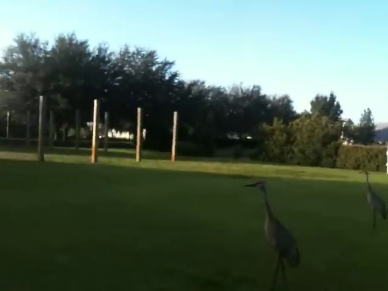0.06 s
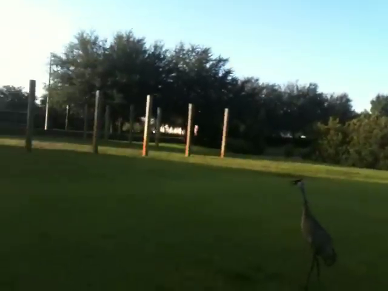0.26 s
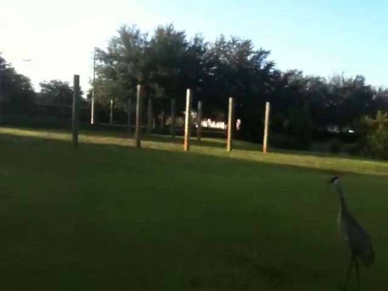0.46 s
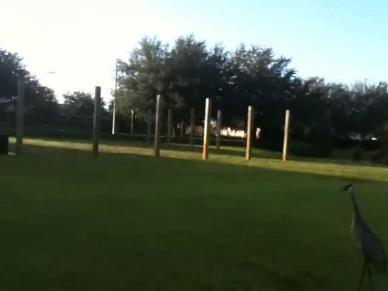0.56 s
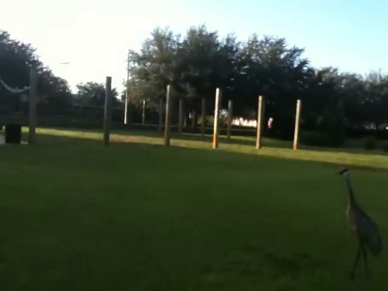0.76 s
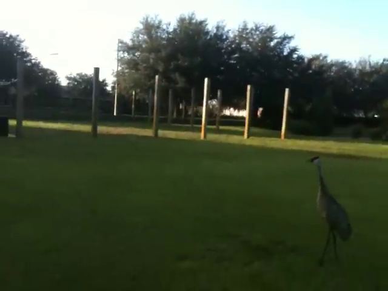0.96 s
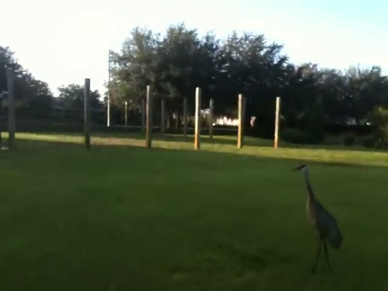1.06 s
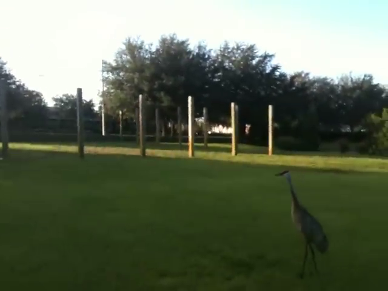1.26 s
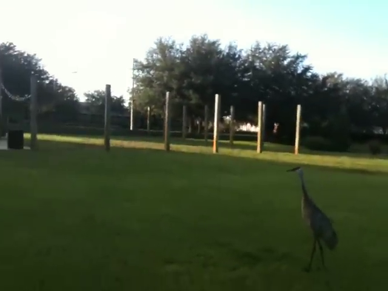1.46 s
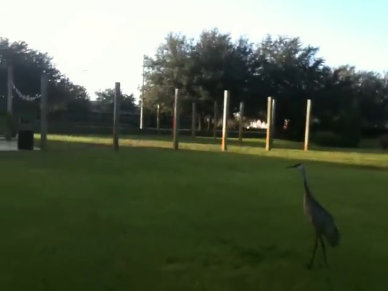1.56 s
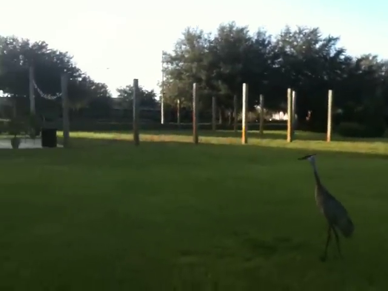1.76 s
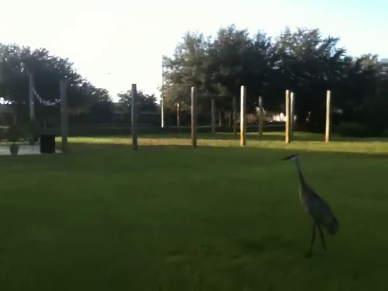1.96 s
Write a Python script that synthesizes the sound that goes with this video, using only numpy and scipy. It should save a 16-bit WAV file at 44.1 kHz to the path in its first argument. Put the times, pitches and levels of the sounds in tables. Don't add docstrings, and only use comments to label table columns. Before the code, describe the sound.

Two cranes call once in duet on an open lawn: the near bird gives a soft rising note then a loud rapid rattle, the farther one overlaps higher and quieter, with slight house echo and low hum, small camera microphone.

```python
import sys
import numpy as np
from scipy import signal
from scipy.fft import rfft, irfft, next_fast_len
from scipy.io import wavfile
from scipy.ndimage import uniform_filter1d

SR = 44100
rng = np.random.default_rng(int(sys.argv[2]) if len(sys.argv) > 2 else 0)


def to_wav(sig):
    pcm = np.clip(np.atleast_2d(sig), -1, 1) * 32767
    pcm = np.round(pcm).astype(np.int16)
    wavfile.write(sys.argv[1], SR, pcm.T)


def amplitude_ratio(level_db):
    exponent = np.asarray(level_db, float) / 20
    return 10 ** exponent


N = 90405
T = np.arange(N) / SR
M = next_fast_len(N + SR)
F = np.maximum(np.arange(M // 2 + 1) * SR / M, 1e-3)

# (first pulse [s], pulse rate [Hz], level [dB], ring pitch [Hz], ring level [dB])
NEAR_BURSTS = [
    (.3199, 947, -8, 844, -3),
    (.3885, 948, -7.5, 848, -3),
    (.4512, 937, -8, 847, -5),
    (.5088, 900, -7.5, 848, -8),
    (.5670, 890, -7.5, 826, -8),
    (.6222, 867.5, -8.5, 794, -7.5),
    (.6765, 828, -12, 788, -4.5),
    (.7335, 585, -29.5, 507, 4),
]
FAR_BURSTS = [
    (.5267, 992, -17.5, 892, 2.5),
    (.6008, 1088, -14.5, 900, -2.5),
    (.6672, 1093, -15, 900, -4),
    (.7273, 1091, -16.5, 939, -5),
    (.7855, 1092, -17, 961, -4.5),
    (.8441, 1046, -17, 897, -1),
    (.8980, 1041, -17.5, 885, -1.5),
    (.9513, 987, -16.5, 878, -2.5),
    (1.0045, 950, -19.5, 824, -2),
    (1.0578, 663, -27, 600, -12),
]
# (centre [Hz], width [Hz], level [dB])
NEAR_PIPE_MODES = [(790, 170, 1), (600, 230, -8), (1370, 220, -12), (2090, 200, -5), (3390, 930, -5.5),
                   (4860, 4500, -8.5), (9100, 14000, -48)]
FAR_PIPE_MODES = [(900, 120, 8.5), (680, 68, -19), (1170, 122, 1.5), (1345, 250, -2), (2050, 500, -2),
                  (2890, 430, -0.5), (4530, 1600, 0), (9100, 5000, -27)]
# (frequency [Hz], level [dB])
PULSE_SPECTRUM = [(500, -3), (900, 3.2), (1800, -13), (3000, -17.5), (5000, -15.5), (8000, -23),
                  (12000, -40.5), (16000, -55.5)]
# (delay [s], pitch [Hz], length [s], level [dB], overtone [dB], knock [Hz], knock [dB])
THROAT_CLOSING = (.0125, 600, .017, -17, -7, 800, -15)
# (time [s], pitch [Hz], level [dB])
NEAR_NOTE = [(.188, 440, -48), (.194, 470, -33), (.202, 510, -28), (.216, 551, -26.5), (.23, 572, -24),
             (.242, 572, -24), (.247, 545, -32), (.255, 520, -50)]
FAR_NOTE = [(.41, 590, -50), (.423, 610, -38), (.435, 630, -36), (.447, 640, -35.5), (.458, 630, -39),
            (.47, 620, -56)]
# (order [-], level [dB])
NOTE_HARMONICS = [(1, 0), (2, -11), (3, -8), (4, -7), (5, -13), (6, -13), (7, -19), (8, -19), (9, -16),
                  (10, -19), (11, -22), (12, -24), (13, -25), (14, -26), (15, -31), (16, -37), (17, -31),
                  (18, -35)]
# (time [s], pitch [Hz], length [s], level [dB])
THROAT_CATCHES = [
    (.190, 900, .012, -38),
    (.238, 1040, .007, -33),
    (.242, 850, .012, -31),
    (.241, 1330, .012, -38),
    (.311, 900, .008, -31),
]
# (delay [s], level [dB])
WALL_SLAPS = [(.024, -30), (.033, -27), (.043, -24), (.052, -27), (.062, -28)]
# (centre [Hz], width [Hz], level [dB])
TAIL_LIFT = (1143, 240, 5.9)
# (frequency [Hz], density [dB/Hz])
HUM_SPECTRUM = [(30, -34), (100, -15), (165, -2.5), (255, -3.5), (320, -16), (1000, -15), (3500, -31),
                (16000, -50)]
# (time [s], level [dB])
TRAFFIC_SWELL = [(0, 0.3), (.3, 0), (1.4, -0.5), (1.9, -0.9), (2.05, 2)]

NEAR_STROKE = dict(pulses_s=.0062, ring_end_s=.0108, ring_fade_db_s=300, ring_tilt_db_oct=-11,
                   air_db=-10, air_fade_s=.011, swell_s=.0036)
FAR_STROKE = dict(pulses_s=.0055, ring_end_s=.02, ring_fade_db_s=650, ring_tilt_db_oct=-12,
                  air_db=-7, air_fade_s=.009, swell_s=.0026)
LEAD_S, RISE_S, STOP_S = .0004, .0016, .0014
SKEW_RAD, JITTER = .3, .015
STROKE_N = int(.05 * SR)
STROKE_T = np.arange(STROKE_N) / SR - LEAD_S
STROKE_ON = np.maximum(STROKE_T, 0)


def crane(bursts, note, modes, stroke, edge_db, closing=None):
    tone, puff = rattle(bursts, stroke, edge_db, closing)
    pipe = sum(amplitude_ratio(db) * mode(hz, width_hz) ** 2 * np.sqrt(SR / 4 / width_hz) for hz, width_hz, db in modes)
    return opening(note) + tone + shape(puff, pipe)


def rattle(bursts, stroke, edge_db, closing):
    tone, puff = np.zeros(N), np.zeros(N)
    loudest_db = max(row[2] for row in bursts)
    age = STROKE_ON / stroke["air_fade_s"]
    for start_s, rate_hz, db, ring_hz, ring_db in bursts:
        air, wobble, shake = rng.standard_normal((3, STROKE_N))
        wobble, shake = (uniform_filter1d(w, size=50) * np.sqrt(50) for w in (wobble, shake))
        effort_db = db - loudest_db
        dull_db = .49 * effort_db
        wave, phase = pulses(rate_hz, stroke, edge_db, dull_db, air, wobble, shake)
        wave += throat_ring(ring_hz, ring_db, stroke, phase, wobble, shake)
        if closing:
            wave += throat_closing(closing, wobble, shake)
        here = slice(int((start_s - LEAD_S) * SR), int((start_s - LEAD_S) * SR) + STROKE_N)
        tone[here] += amplitude_ratio(db) * wave
        air_db = db + stroke["air_db"] + 2 * dull_db + 2.86 * shake
        puff[here] += amplitude_ratio(air_db) * air * age * np.exp(-age ** 1.7)
    return tone, puff


def pulses(rate_hz, stroke, edge_db, dull_db, air, wobble, shake):
    length_s = stroke["pulses_s"]
    drift = 1 - 7 * STROKE_ON + JITTER * wobble / 2
    phase = 2 * np.pi * (np.cumsum(rate_hz * drift) / SR - rate_hz * 0.000401)
    env = np.clip(STROKE_T / RISE_S + 0.23, 0, 1)
    env = env * np.clip((length_s + STOP_S - STROKE_T) / STOP_S, 0, 1)
    k = np.arange(1, int(16500 / rate_hz) + 1)[:, None]
    fade_db = 903 * np.maximum(STROKE_T - .003, 0)
    edge = edge_db + dull_db * np.log2(k) - fade_db + 2.17 * shake
    body = -8 * abs(STROKE_T / stroke["swell_s"] - 1) ** 1.6
    level_db = table_db(PULSE_SPECTRUM, k * rate_hz) + np.where(k > 1, edge, body)
    skew = SKEW_RAD * (k > 1) * (1 + .15 * k * shake * STROKE_ON / length_s)
    wave = -np.sum(amplitude_ratio(level_db) * np.cos(k * phase + skew), axis=0)
    hiss = amplitude_ratio(-20 + 9.0 * dull_db) * air * (1 + np.cos(phase))
    thump = amplitude_ratio(-34)
    return env * (wave + hiss - thump), phase


def throat_ring(hz, db, stroke, pulse_phase, wobble, shake):
    length_s = stroke["pulses_s"]
    end = int(length_s * SR)
    phase = 2 * np.pi * np.cumsum(hz * (1 + JITTER * wobble)) / SR
    phase += pulse_phase[end] - phase[end] - .6
    hold = np.clip((STROKE_T - length_s) / STOP_S + .5, 0, 1)
    hold = hold * np.clip((stroke["ring_end_s"] - STROKE_T) / STOP_S / 2 + 1, 0, 1)
    k = np.arange(1, 10)[:, None]
    level = amplitude_ratio(stroke["ring_tilt_db_oct"] * np.log2(k))
    wave = -np.sum(level * np.cos(k * phase + SKEW_RAD * k * shake), axis=0)
    return amplitude_ratio(db - stroke["ring_fade_db_s"] * (STROKE_T - length_s) + 0.53 * shake) * hold * wave


def throat_closing(closing, wobble, shake):
    delay_s, hz, length_s, db, overtone_db, knock_hz, knock_db = closing
    t = STROKE_T - delay_s
    soft = amplitude_ratio(db) * grain(t, hz, length_s, overtone_db, wobble)
    return soft + amplitude_ratio(knock_db + 2 * shake) * grain(t, knock_hz, length_s * 0.84, -32, wobble)


def opening(note):
    s, hz, db = np.array(note).T
    pitch_hz = np.interp(T, s, hz)
    phase = 2 * np.pi * np.cumsum(pitch_hz * (1 + .007 * walk(196.5))) / SR
    level_db = np.interp(T, s, db)
    effort_db = level_db - db.max()
    wave = np.zeros(N)
    for k, order_db in NOTE_HARMONICS:
        mouth_db = 8 * np.exp(-((k * pitch_hz - 1010) / 70) ** 2)
        flutter_db = 2.2 * walk(123.4) * (k > 1)
        bloom_db = 1.3 * effort_db * np.log2(k) * (k > 2)
        wave -= amplitude_ratio(order_db + mouth_db + flutter_db + bloom_db) * np.cos(k * phase + 1.6 * np.log2(k))
    wave += amplitude_ratio(-27 + 2 * effort_db) * rng.standard_normal(N) * (1 + np.cos(phase))
    return amplitude_ratio(level_db) * wave * (T > s[0]) * (T < s[-1])


def catches():
    return sum(amplitude_ratio(db) * grain(T - s, hz, length_s, -23, walk(300)) for s, hz, length_s, db in THROAT_CATCHES)


def grain(t, hz, length_s, overtone_db, wobble):
    u = np.clip(t / length_s, 0, 1)
    phase = 2 * np.pi * np.cumsum(hz * (1.05 - 0.12 * u + JITTER * wobble)) / SR
    return np.sin(np.pi * u ** 0.58) * (np.cos(phase) + amplitude_ratio(overtone_db) * np.cos(2.15 * phase))


def yard(x):
    slaps = sum(amplitude_ratio(db) * np.exp(-2j * np.pi * F * lag_s) for lag_s, db in WALL_SLAPS)
    slaps = slaps / (1 + 1j * F / 5000)
    t = T[:SR]
    t60_s, start_s = 1.1, .025
    tail = rng.standard_normal(SR) * amplitude_ratio(-60 * t / t60_s) * (1 - np.exp(-(t / start_s) ** 2))
    tail = rfft(tail / np.sqrt(np.sum(tail ** 2)), M) * amplitude_ratio(-23) / (1 + 1j * F / 9000)
    lift_hz, lift_width_hz, lift_db = TAIL_LIFT
    tail = tail * (1 - 0.36 * mode(910.0, 300.)) * (1 + amplitude_ratio(lift_db) * mode(lift_hz, lift_width_hz))
    return shape(x, 1 + slaps + tail)


def suburb():
    drone = amplitude_ratio(-3.5) * abs(mode(227, 100)) ** 2
    colour = amplitude_ratio(table_db(HUM_SPECTRUM, F)) * (1 + drone)
    traffic_db = np.interp(T, *np.array(TRAFFIC_SWELL).T)
    hum, swell = np.zeros(N), walk(1.584)
    for octave in np.arange(4, 15):
        band = np.clip(1 - abs(np.log2(F) - octave), 0, 1) ** .5
        noise = shape(np.resize(rng.standard_normal(N), M), colour * band)
        hum += noise * amplitude_ratio(.6 * swell + 0.96 * walk(6.7) + (octave > 8) * traffic_db)
    whine = shape(rng.standard_normal(N), mode(15000, 80.) ** 2)
    return hum / hum.std() * amplitude_ratio(-48.5) + whine / whine.std() * amplitude_ratio(-89)


def shape(x, response):
    return irfft(rfft(x, M) * response, M)[:N]


def mode(hz, width_hz):
    return 1 / (1 + 1j * (F ** 2 - hz ** 2) / (F * width_hz))


def table_db(rows, hz):
    rows = np.array(rows, float)
    return np.interp(np.log(hz), np.log(rows[:, 0]), rows[:, 1])


def walk(rate_hz):
    k = int(SR / rate_hz)
    steps = np.repeat(rng.standard_normal(N // k + 1), k)
    w = uniform_filter1d(uniform_filter1d(steps, k), k)[:N]
    return w / w.std()


def scene():
    birds = crane(NEAR_BURSTS, NEAR_NOTE, NEAR_PIPE_MODES, NEAR_STROKE, 0, THROAT_CLOSING)
    birds += crane(FAR_BURSTS, FAR_NOTE, FAR_PIPE_MODES, FAR_STROKE, 4.5)
    birds += catches()
    mic = (1 - 0.52 * mode(344.0, 525.0)) / (1 - 1j * 91 / F)
    return (shape(yard(birds), mic) + suburb())[None]


def low_pass(x):
    return signal.sosfilt(signal.butter(12, 16960, fs=SR, output="sos"), x)


def record(dry):
    limit = .9
    soft = limit * np.tanh(dry / limit)
    soft = signal.lfilter(*signal.butter(1, 40, "high", fs=SR), soft)
    mix = signal.sosfilt(signal.ellip(6, .2, 50, 16000, fs=SR, output="sos"), soft)
    return low_pass(mix)


dry = scene()
out = record(dry)
to_wav(out)
```